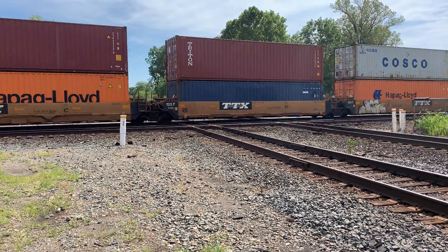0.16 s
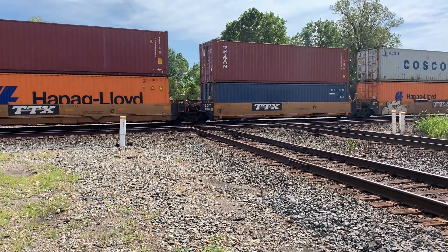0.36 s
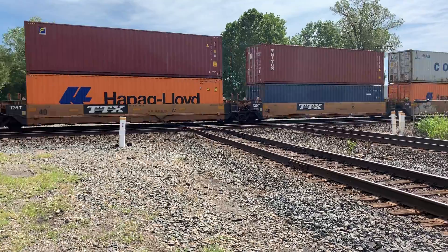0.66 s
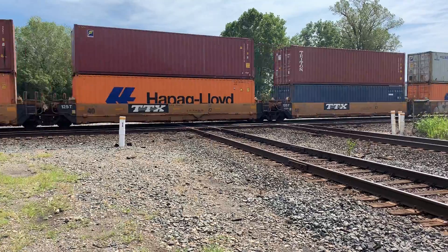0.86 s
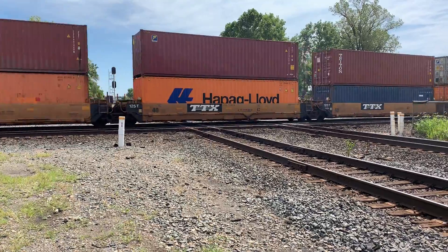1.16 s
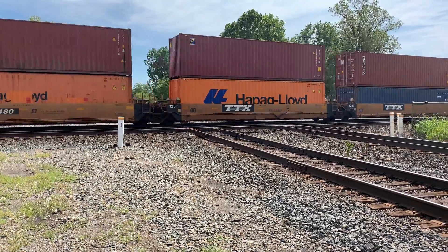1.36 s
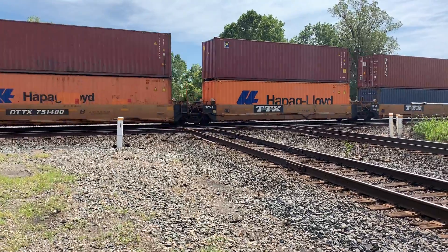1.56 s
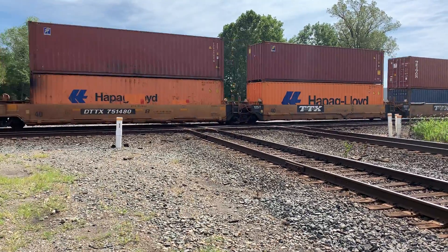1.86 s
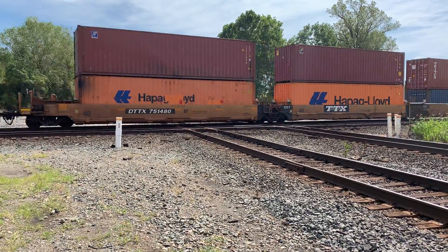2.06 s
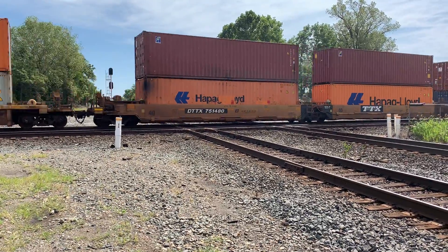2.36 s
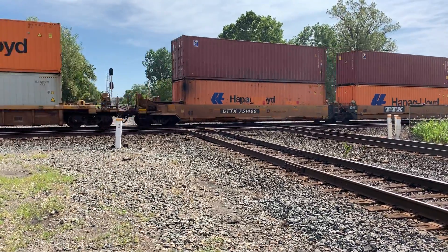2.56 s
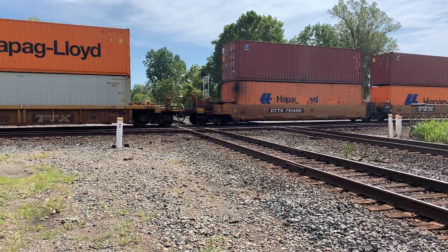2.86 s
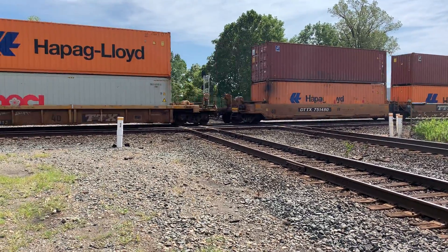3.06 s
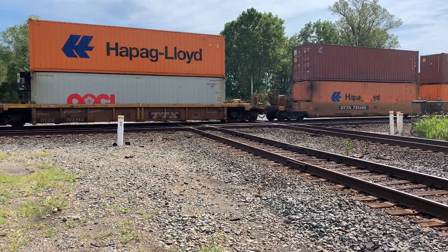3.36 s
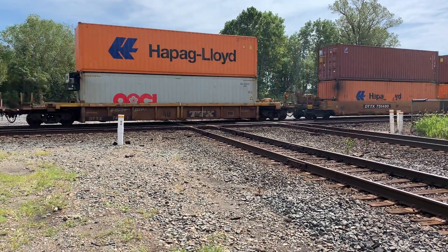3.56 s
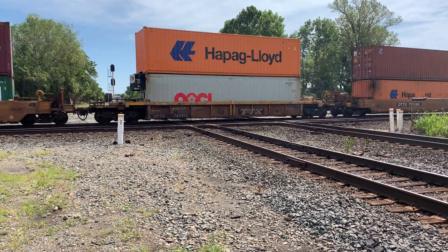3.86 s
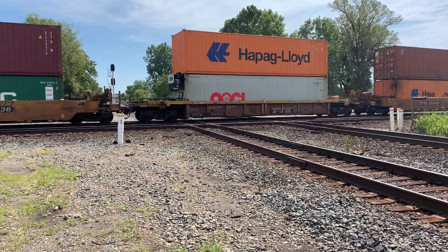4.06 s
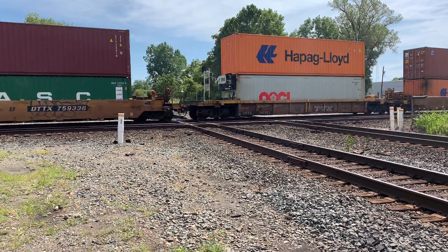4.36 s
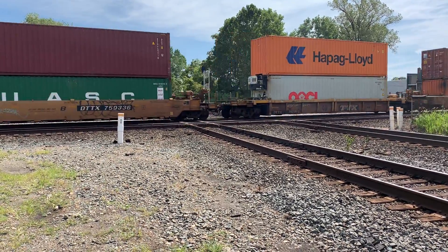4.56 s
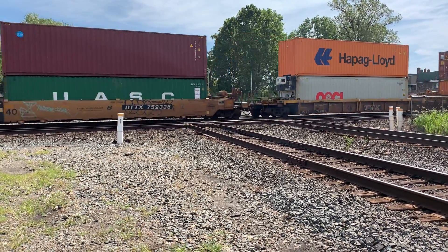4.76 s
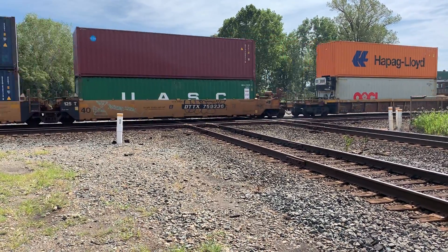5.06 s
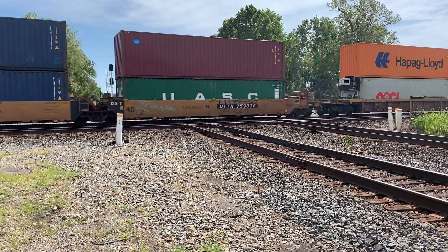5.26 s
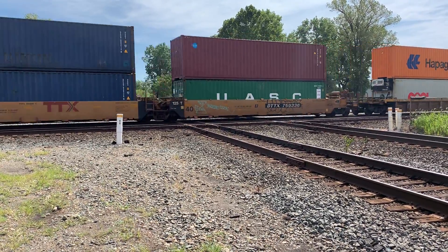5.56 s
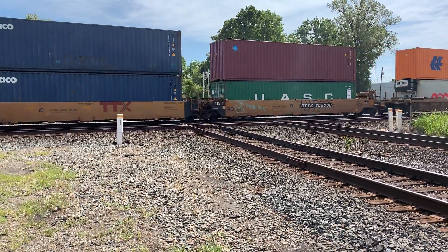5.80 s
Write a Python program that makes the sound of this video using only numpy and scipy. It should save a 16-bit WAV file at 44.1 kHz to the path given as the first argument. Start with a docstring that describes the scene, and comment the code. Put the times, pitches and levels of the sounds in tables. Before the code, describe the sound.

Heavy rail cars clatter across a track crossing outdoors, pounding a recurring double-knock rhythm with rattling steel, deep booms and a few brief squeaks.

```python
"""Freight train over a diamond crossing

A double-stack freight train rolls over a diamond crossing a few car lengths away. Each two-axle truck meets the
same four gaps, so every truck plays one rhythm; at a coupling two overlap. At each gap shaped noise bursts make
the ground boom, the car thud, the steel clang and rattle, the wheel ring. Coloured noise under the blows swells
with every truck; narrow noise makes the flanges squeak and the rails ring. Cars and trees throw the clatter and
squeaks back as scattered, decaying echoes."""
import sys
import numpy as np
from scipy import signal
from scipy.fft import irfft, next_fast_len
from scipy.io import wavfile

SR = 44100
rng = np.random.default_rng(int(sys.argv[2]) if len(sys.argv) > 2 else 0)


def to_wav(s):
    """Save 16-bit WAV."""
    ch = np.atleast_2d(s).T  # columns
    pcm = np.round(np.clip(ch, -1, 1) * 32767)  # PCM
    wavfile.write(sys.argv[1], SR, pcm.astype(np.int16))


N = 261513  # samples


def amp(db):
    """Turns decibels into amplitude gain."""
    return np.exp(np.asarray(db) * (np.log(10) / 20))


def evened(x):
    """Scales a sound to rms 1, over both channels together if stereo."""
    return x / np.sqrt(np.mean(x ** 2) + 1e-20)


def read(points, hz):
    """Reads a table along a log-frequency axis."""
    f, value = np.transpose(points)
    return np.interp(np.log(hz + 1), np.log(f + 1), value)


def add(mix, s, sound):
    """Mixes a stereo sound in at time s; what falls before zero is dropped."""
    start = round(s * SR)
    sound = sound[:, max(-start, 0):]
    part = mix[:, max(start, 0):][:, :sound.shape[1]]
    part += sound[:, :part.shape[1]]


# likeness of the two microphone ports: (frequency [Hz], likeness [0 to 1])
PORT_LIKENESS = [(60, .99), (330, .98), (600, 0.86), (830, 0.6), (1050, 0.78), (1400, 0.6), (1850, 0.4),
                 (2150, 0.6), (2750, .95), (3100, 0.5), (4000, 0.55), (6000, 0.45), (7600, .95),
                 (14000, .95)]
# phase of the first port against the second: (frequency [Hz], phase [rad])
PORT_PHASE = [(100, -.1), (1900, -.5), (2300, .7), (3800, 2), (4500, 1), (5500, -2.2), (6000, -4.2),
              (7700, -6.2), (9800, -9.4), (11500, -12.5), (13500, -15.7), (16000, -19.5)]
# level of the first port against the second: (frequency [Hz], level [dB])
PORT_BALANCE = [(60, 2), (99, 0.5), (160, 1.0), (270, -1), (450, 1), (740, 1.5), (1220, 1.5), (2010, 1.5),
                (3330, 0), (5500, -4), (9080, 1), (15000, -0.5)]
MOST_ALIKE = .988  # cap on the likeness of the direct sound


def ports(size):
    """Frequencies, likeness and complex gains of the two ports for a sound of this many samples."""
    hz = np.fft.rfftfreq(size, 1 / SR)
    same = np.clip(read(PORT_LIKENESS, hz), 0, MOST_ALIKE)
    # each port takes half of the level and phase difference
    lead = amp(read(PORT_BALANCE, hz) / 2) * np.exp(.5j * read(PORT_PHASE, hz))
    gains = np.array([lead, 1 / lead]) / np.sqrt(abs(lead) ** 2 + abs(lead) ** -2)
    return hz, same, gains


def noise(colour_db, mic, ripple_db=0, ripple_hz=60):
    """Stereo noise of one colour; the ripple stands for a crowd of close resonances."""
    hz, same, gains = mic
    a, b, c, d, bumps = rng.standard_normal((5, len(hz)))
    first, other = a + 1j * b, c + 1j * d
    pair = np.array([first, same * first + np.sqrt(1 - same ** 2) * other])
    ripple = np.tanh(np.interp(hz / ripple_hz, np.arange(len(hz)), bumps))
    return evened(irfft(pair * gains * amp(colour_db + ripple_db * ripple)))


def chatter(size, per_s, fade_s, depth):
    """Gain whose power rises in sharp steps and fades as loose parts knock against each other."""
    chance, strength = rng.random(size), rng.exponential(1, size)
    hits = (chance < per_s / SR) * strength
    knocks = signal.lfilter([1], [1, -np.exp(-1 / (fade_s * SR))], hits)
    return evened(np.sqrt(1 + depth * knocks))


def swell(weights_db, far_db, truck_db, peak_s, width_s):
    """Gain of a rolling layer: the steady power of the far train plus a bell for each truck that passes."""
    t = np.arange(0, N + 256, 256) / SR
    near = sum(amp(db) ** 2 * np.exp(-((t - truck[0] - peak_s) / width_s) ** 2)
               for truck, db in zip(TRUCKS, weights_db))
    gain = np.sqrt(amp(far_db) ** 2 + amp(truck_db) ** 2 * near)
    return np.interp(np.arange(N) / SR, t, gain)


# relative colour of the shaking ground: (frequency [Hz], level [dB per Hz])
SHAKE_COLOUR = [(12, -22), (24, -25), (42, 1), (55, 3), (90, -16), (200, -50)]
# relative colour of the rolling cars: (frequency [Hz], level [dB per Hz])
RUMBLE_COLOUR = [(30, -23), (55, -1), (72, -4), (100, 2), (140, -1.5), (220, -5.5), (330, -14.5),
                 (700, -52.5)]
# relative colour of treads on the rail, also of the growl before a blow: (frequency [Hz], level [dB per Hz])
ROAR_COLOUR = [(150, -14), (350, -7), (600, -3.5), (850, -8.5), (1100, -10), (1500, -13.5), (2500, -17),
               (3200, -27), (6000, -55)]
# relative colour of loose steel, in the hiss and in the blows: (frequency [Hz], level [dB per Hz])
RATTLE_COLOUR = [(1500, -17), (3000, 3.5), (3900, 3.5), (5000, 2), (6000, -0.5), (7000, -3), (7800, 0),
                 (9500, -1), (10500, -3), (12000, -4.5), (14000, -6.5), (16000, -25.5)]


def rolling():
    """Rough treads on the rail: ground shakes under heavy trucks, cars rumble, steel roars and hisses."""
    mic = ports(next_fast_len(N // 2 + 1) * 2)
    hz = mic[0]
    knocks = chatter(N, per_s=50, fade_s=0.0049, depth=1.1)
    _, _, force_db, load_db, *_, tread_db = np.transpose(TRUCKS)

    # far_db is the steady level; peak_s counts from the truck's first contact
    shake = noise(read(SHAKE_COLOUR, hz), mic)[:, :N]
    shake *= swell(force_db + load_db, far_db=-34, truck_db=-30.5, peak_s=.3, width_s=.45)

    rumble = noise(read(RUMBLE_COLOUR, hz), mic)[:, :N]
    rumble *= swell(force_db, far_db=-22, truck_db=-18, peak_s=.65, width_s=.22)

    roar = noise(read(ROAR_COLOUR, hz), mic, ripple_db=3.5, ripple_hz=44.6)[:, :N] * knocks
    roar *= swell(force_db + tread_db, far_db=-34, truck_db=-25, peak_s=.5, width_s=.4)

    hiss = noise(read(RATTLE_COLOUR, hz), mic, ripple_db=1, ripple_hz=88.7)[:, :N] * knocks ** .5
    hiss *= swell(force_db, far_db=-42, truck_db=-32, peak_s=.42, width_s=.35)
    return shake + rumble + roar + hiss


# decay of the air between cars and trees: (frequency [Hz], time to fall 60 dB [s])
ECHO_DECAY = [(100, 0.61), (500, 1), (2000, 0.77), (6000, 1.0), (14000, 0.57)]


def echoes(x, delay_s=.04):
    """Scattered reflections from cars and trees, each band dying at its own speed."""
    taps = rng.standard_normal((2, SR)) * (rng.random((2, SR)) < 2000 / SR)  # 2000 per second
    taps = taps * (np.arange(SR) > delay_s * SR)
    hz, t, z = signal.stft(taps, SR, nperseg=256)
    same = np.clip(read(PORT_LIKENESS, hz), -1, 1)[:, None]
    z[1] = same * z[0] + np.sqrt(1 - same ** 2) * z[1]
    decay = amp(-60 * t / read(ECHO_DECAY, hz)[:, None])
    tail = signal.istft(z * decay, SR, nperseg=256)[1]
    return signal.fftconvolve(x, tail / np.linalg.norm(tail[0]), axes=1)[:, :N]


# flange squeaks and longer rings of the rail, level before the fades: # (time [s], length [s], frequency [Hz],
# offset where the peak is 6 dB down [Hz], level [dB])
SQUEAKS_AND_RINGS = [(.6, 0.29, 4460, 60, -40), (.69, 0.05, 7400, 200, -31), (1.08, 0.21, 4450, 120, -39),
                     (1.575, 0.099, 4300, 50, -45), (1.86, 0.17, 7450, 80, -41),
                     (4.998, 0.46, 4900, 300, -30.5), (5.1, 0.4, 2445, 55, -30), (5.735, 0.055, 4310, 50, -38)]


def squeaks_and_rings():
    """Short rough squeaks as a flange rubs the rail, and longer rings of the rail: one narrow resonance each."""
    out, mic = np.zeros((2, N)), ports(SR)
    for s, length, hz, width, db in SQUEAKS_AND_RINGS:
        resonance_db = -20 * np.log10(1 + ((mic[0] - hz) / width) ** 2)
        squeak = noise(resonance_db, mic)[:, :round(length * SR)]
        fades = signal.windows.tukey(squeak.shape[1], .5)
        add(out, s, amp(db) * evened(squeak) * fades)
    return out


def run_up(mic):
    """The battered rail end growls more and more just before the wheel drops."""
    hz, t = mic[0], np.arange(RUN_UP_SIZE) / SR
    growth = np.interp(t, [0, RUN_UP_S, RUN_UP_S + 0.015], [0, 1, 0])
    dull_db = -20 * np.log10(1 + (hz / 900) ** 2)
    return growth * noise(read(ROAR_COLOUR, hz) + dull_db, mic)


def burst(t, rise, hold, t60):
    """A rise, a hold while the wheel chatters on the rail, then a decay."""
    return np.tanh(t / rise) * amp(-60 * np.maximum(t - hold, 0) / t60)


def struck(sound, envelope):
    """Lays an envelope on a sound and gives it the envelope's energy."""
    return evened(sound * envelope) * np.sqrt(np.mean(envelope ** 2))


def wheel_colour(modes, hz, spread=0.0035, uneven_db=3):
    """Resonance peaks in dB; every blow detunes the modes a little and rings them with other strengths."""
    centre, width, db = np.transpose(modes)[:, :, None]
    detune, strength = rng.standard_normal((2, len(modes), 1))
    off = (hz - centre * (1 + spread * detune)) / width
    power = amp(db + uneven_db * strength) ** 2 / (1 + off ** 2) ** 2
    return 10 * np.log10(np.sum(power, axis=0))


# relative colour of the ground under a blow: (frequency [Hz], level [dB per Hz])
BOOM_COLOUR = [(20, -27), (40, -12), (62, 2.5), (90, 7), (125, -15), (200, -22.5), (400, -43.5)]
# relative colour of the car's thud: (frequency [Hz], level [dB per Hz])
THUD_COLOUR = [(60, -26), (110, -4), (160, 1), (235, 3), (320, -11), (500, -17.5), (1000, -39)]
# relative colour of the struck steel: (frequency [Hz], level [dB per Hz])
CLANG_COLOUR = [(150, 1), (330, -6.5), (450, 2), (700, 2), (840, -4.5), (1080, 0), (1350, -6), (2000, -5),
                (2650, -10.5), (2950, -15.5), (4000, -28.5), (8000, -47)]
# relative colour of the first contact: (frequency [Hz], level [dB per Hz])
CRACK_COLOUR = [(300, -10), (900, -5.5), (1500, -3.5), (2100, 4), (2650, -2), (3100, -12), (5000, -14.5),
                (9000, -24.5)]
CRACK_DB = -1  # against the ring
BLOW_SIZE = 12288  # samples


def blow(gap, modes, load_db, jolt_db, ring_db, loose_db, mic):
    """One wheel in one gap: ground booms, car thuds, steel clangs and rattles, wheel rings."""
    _, clang_db, thud_db, boom_db, rise, hold = gap
    hz, t = mic[0], np.arange(BLOW_SIZE) / SR
    knocks = chatter(BLOW_SIZE, per_s=140, fade_s=0.0025, depth=0.76)

    boom = noise(read(BOOM_COLOUR, hz), mic)
    boom = struck(boom, burst(t, 0.013, hold + 0.012, t60=0.23))

    thud = noise(read(THUD_COLOUR, hz), mic, ripple_db=5.5, ripple_hz=25.28)
    thud = struck(thud, burst(t, rise + 0.0013, hold + 0.0046, t60=0.28))

    clang = noise(read(CLANG_COLOUR, hz), mic, ripple_db=6.0, ripple_hz=84.7) * knocks
    clang = struck(clang, burst(t, rise, hold, t60=0.23))

    ring = struck(noise(wheel_colour(modes, hz), mic), burst(t, rise, hold, t60=.23))

    rattle = noise(read(RATTLE_COLOUR, hz), mic, ripple_db=8.5, ripple_hz=109.9) * knocks ** .5
    rattle = struck(rattle, burst(t, rise + 0.004, hold, t60=.4))

    # the first contact is a short hard crack that starts the ring
    crack = noise(read(CRACK_COLOUR, hz), mic, ripple_db=10.5, ripple_hz=160.4)
    crack = struck(crack, burst(t, 0.001, 0.0066, t60=0.15))

    wheel = amp(ring_db) * (ring + amp(CRACK_DB) * crack)
    steel = clang + wheel + amp(loose_db) * rattle
    return amp(boom_db + load_db) * boom + amp(thud_db + jolt_db) * thud + amp(clang_db) * steel


# nominal wheel modes of the leading and the following cars:
# (frequency [Hz], offset where the peak is 6 dB down [Hz], level [dB])
LEADING_WHEELS = [(980, 33, -2), (1526, 93, 0.5), (1850, 63, -2.5), (2120, 14, 5), (2355, 84, -5),
                  (2590, 35, 3), (3160, 73, -5.5), (3900, 60, -2.5), (4380, 60, -7), (5120, 29, -15),
                  (7570, 51, -16.5)]
FOLLOWING_WHEELS = [(426, 18.6, 4.5), (1085, 38, 0.5), (1500, 75, -0.5), (1792, 36, 1.5), (2090, 33, -3.5),
                    (2438, 28, 1.5), (2646, 41, 2.5), (3044, 30, -7.5), (3320, 45, -8.5), (3910, 68, -5.5),
                    (4530, 21, -6.5), (5065, 48, -13)]
FOLLOWING_FROM_S = 2.7
# one row a truck: (time its first axle meets the first gap [s], lag of its second axle [s], force [dB],
# load on the ground [dB], jolt of its car [dB], ring of its wheels against the clang [dB],
# rattle of its loose steel against the clang [dB], roughness of its treads [dB])
TRUCKS = [(-0.737, .111, 1, 1, 1.5, -5.5, -9.5, -6), (0.44, .117, -1.3, 4, 2.5, -3.5, -6.3, -4),
          (1.621, .107, -1.2, 5, 2, -4, -5.5, -3.5), (2.793, .125, 0.3, -3, -1, -7, -6.3, 0),
          (3.129, .107, 0.3, -6, 1, -4.5, -8.3, 3), (4.302, .11, 1.6, -4, -3, -3.3, -5, 2),
          (4.641, .102, -0.5, 0, -1.5, -4.5, -5, 0), (5.798, .109, 1.3, 2.5, 0, -6, -6.5, 0)]
# one row a gap in the rails: (time after the first gap [s], clang of the steel [dB],
# thud of the car [dB], boom of the ground [dB], rise of the clang [s], hold of the clang [s])
RAIL_GAPS = [(0, -15, -13, -20, .007, .036), (.147, -17, -18, -20, .007, .033),
             (.487, -15.8, -17.5, -23, .006, .033), (.633, -19, -20, -19.5, .007, .03)]
# a last dull knock as the truck rolls off the crossing: (time after the first gap [s],
# clang [dB], thud [dB], boom [dB], rise of the clang [s], hold of the clang [s])
LAST_KNOCK = (.982, -29, -20.5, -27, .006, .012)
SECOND_AXLE_DB = -.5  # against the first axle
RUN_UP_S, RUN_UP_DB, RUN_UP_SIZE = .05, -12.5, 4096  # growth; level against the clang; samples


def crossing():
    """Both axles of every truck strike every gap in turn; one last knock follows."""
    out, mic, short_mic = np.zeros((2, N)), ports(BLOW_SIZE), ports(RUN_UP_SIZE)
    for start, axle_lag, force_db, *truck, _ in TRUCKS:
        modes = LEADING_WHEELS if start < FOLLOWING_FROM_S else FOLLOWING_WHEELS
        for gap in RAIL_GAPS:
            delay, clang_db = gap[:2]
            for lag, axle_db in ((0, 0), (axle_lag, SECOND_AXLE_DB)):
                s, force = start + delay + lag, amp(force_db + axle_db)
                add(out, s, force * blow(gap, modes, *truck, mic))
                add(out, s - RUN_UP_S, force * amp(clang_db + RUN_UP_DB) * run_up(short_mic))
        knock = blow(LAST_KNOCK, modes, *truck, mic)
        add(out, start + LAST_KNOCK[0], amp(force_db) * knock)
    return out


def scene():
    """Blows, squeaks and rail rings with their echoes, over the rolling noise."""
    steel = crossing() + squeaks_and_rings()
    return steel + amp(-7.5) * echoes(steel) + rolling()


def record(dry, ceiling_db=1.5, edge_hz=16000):
    """Rounds off the loudest peaks, then limits the band."""
    rounded = amp(ceiling_db) * np.tanh(dry / amp(ceiling_db))
    lowpass = signal.firwin(511, edge_hz, window=("kaiser", 9), fs=SR)
    return signal.oaconvolve(rounded, lowpass[None], "same")


dry = scene()
out = record(dry)
to_wav(out)
```